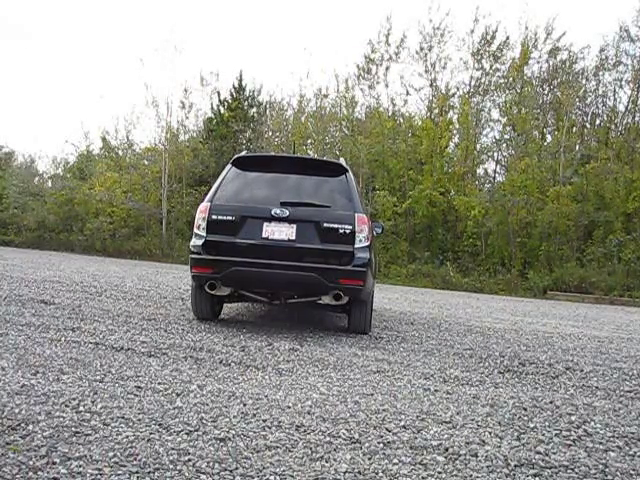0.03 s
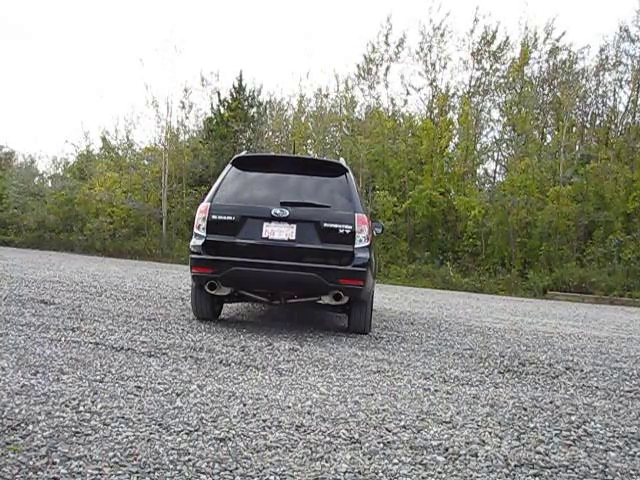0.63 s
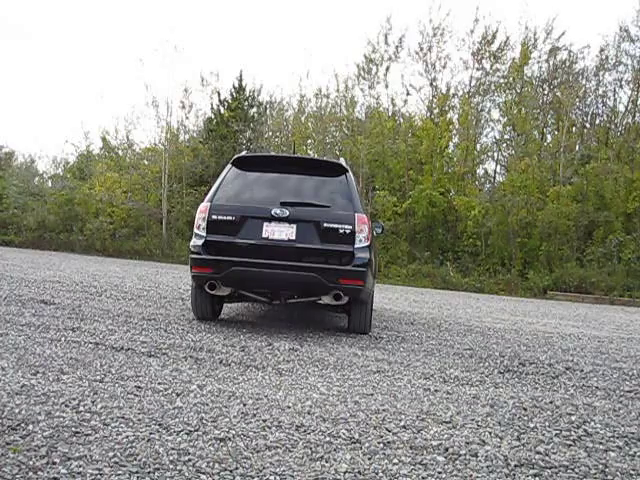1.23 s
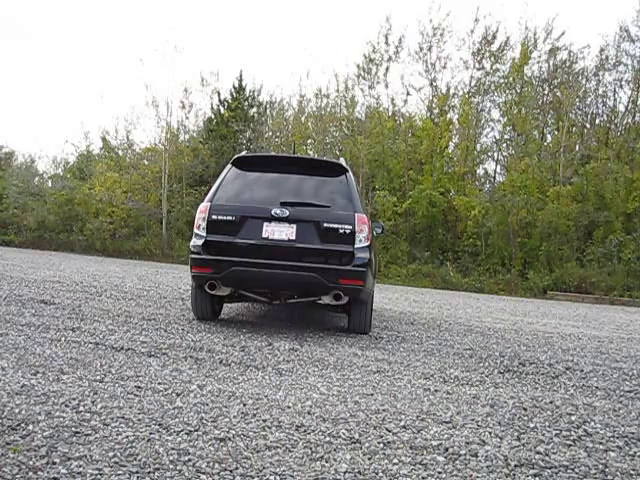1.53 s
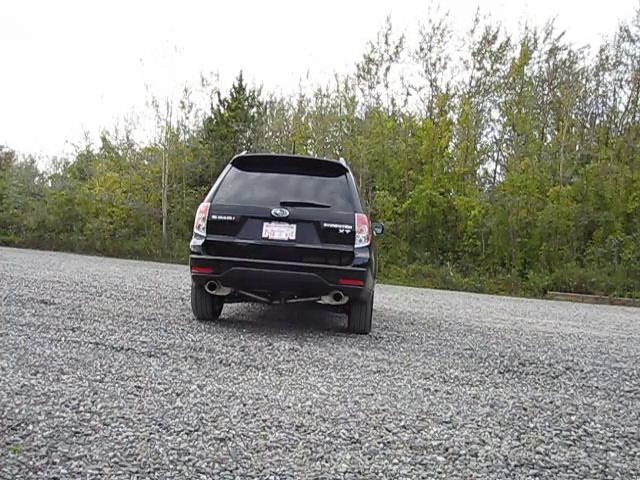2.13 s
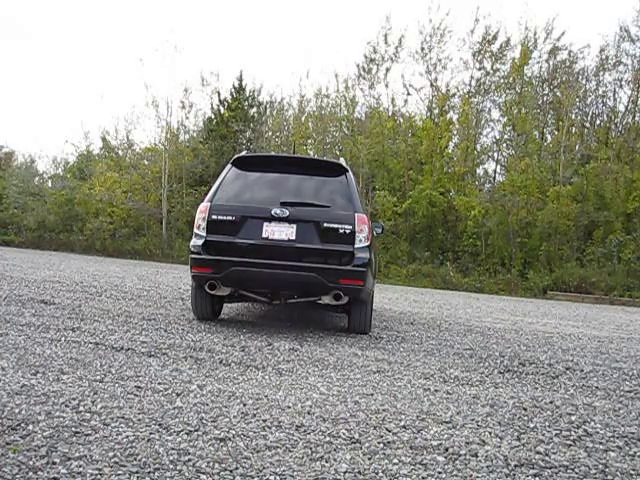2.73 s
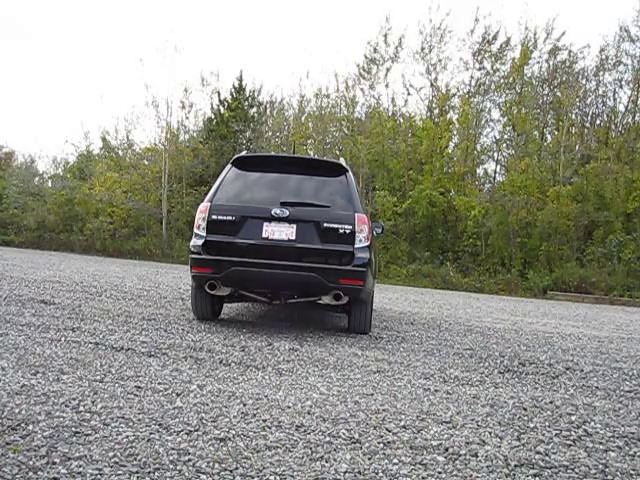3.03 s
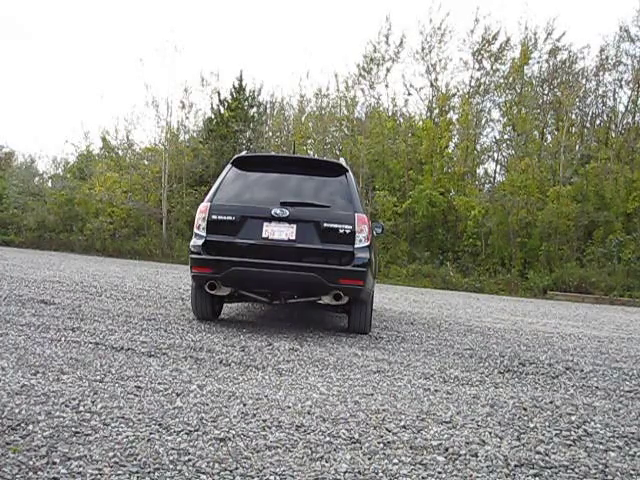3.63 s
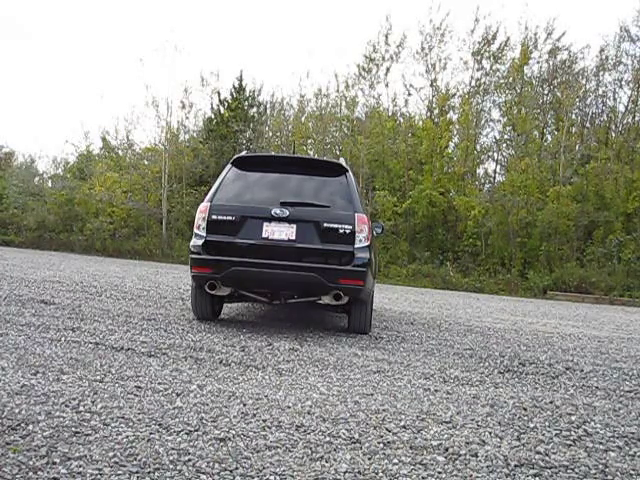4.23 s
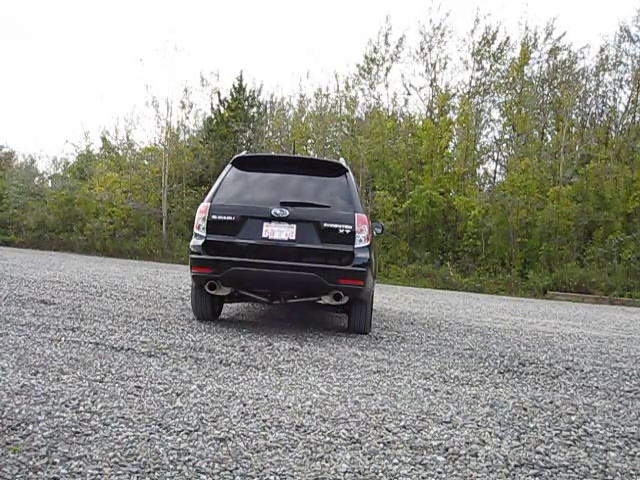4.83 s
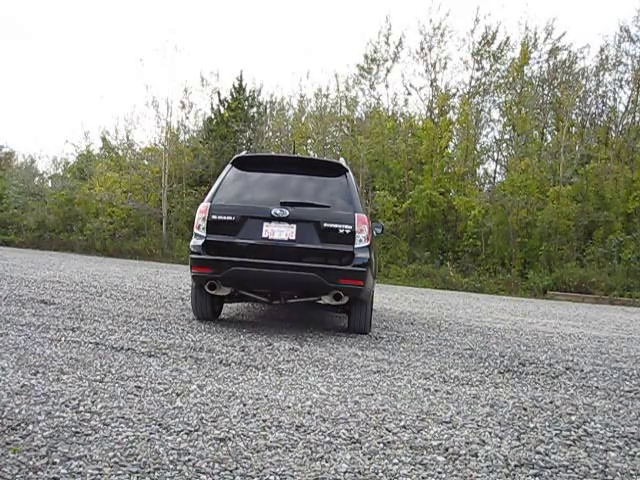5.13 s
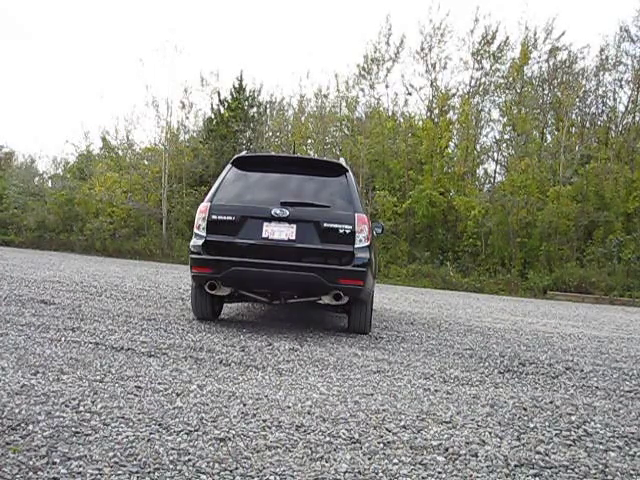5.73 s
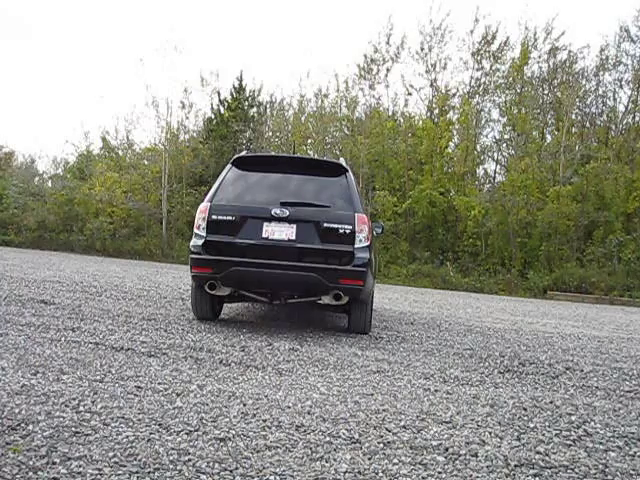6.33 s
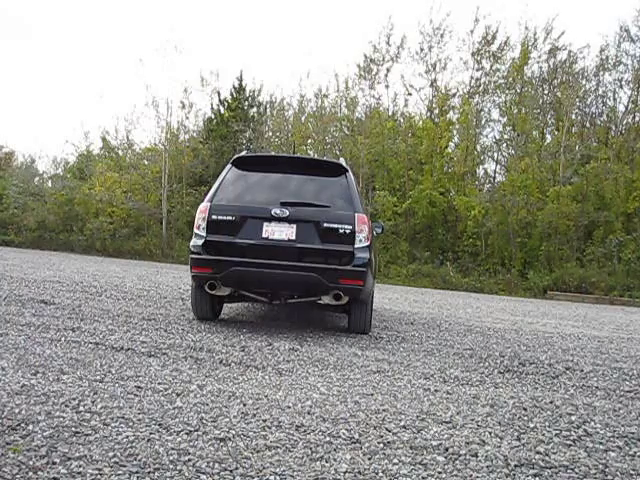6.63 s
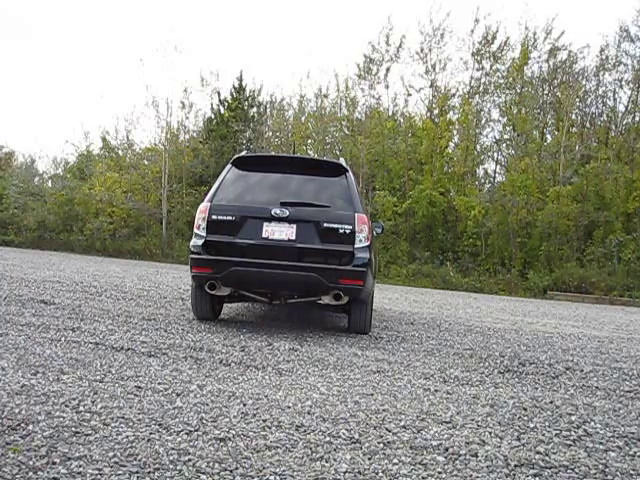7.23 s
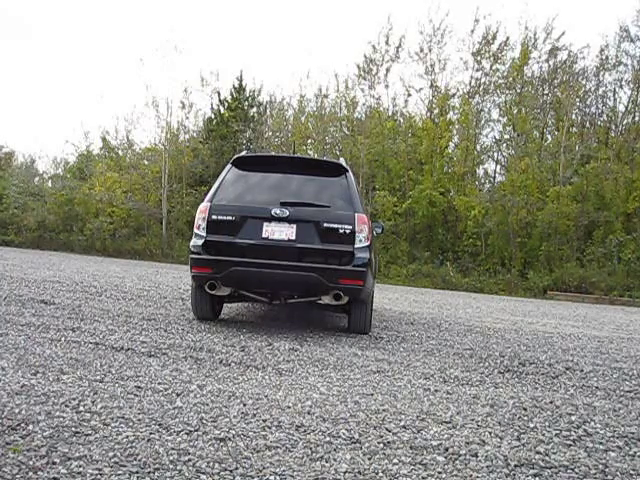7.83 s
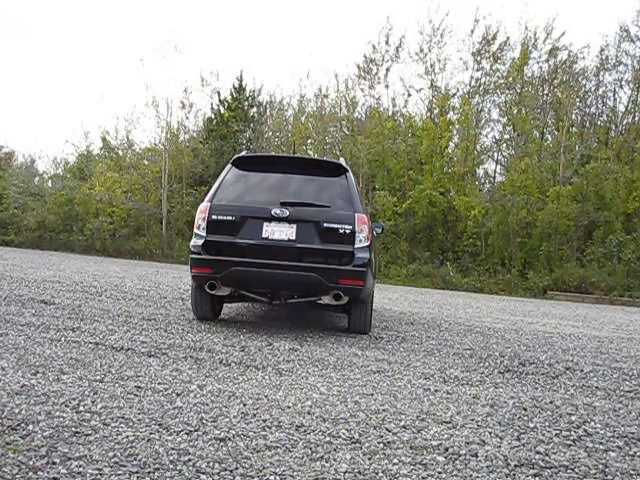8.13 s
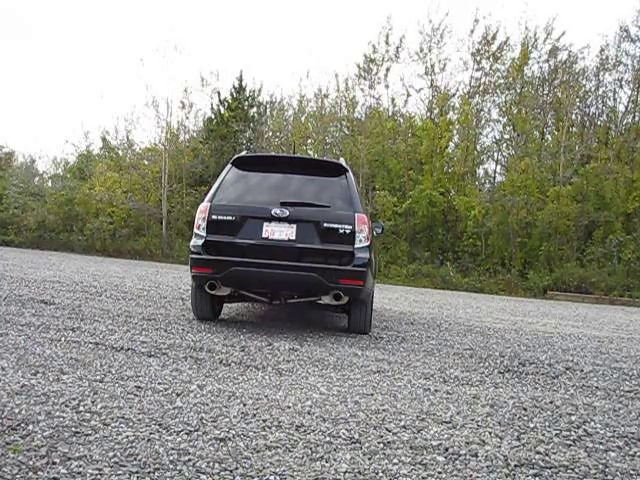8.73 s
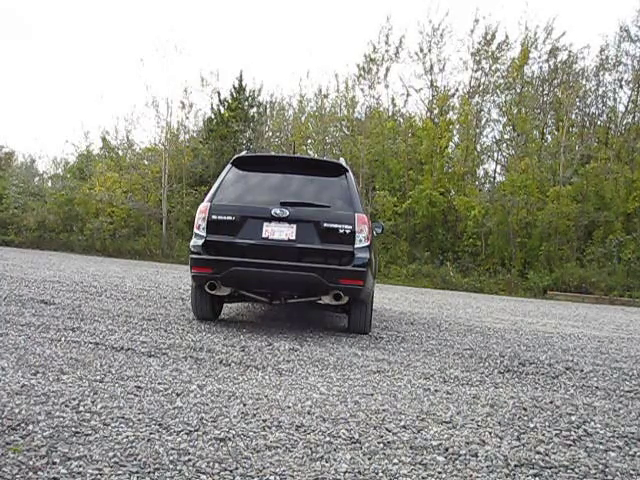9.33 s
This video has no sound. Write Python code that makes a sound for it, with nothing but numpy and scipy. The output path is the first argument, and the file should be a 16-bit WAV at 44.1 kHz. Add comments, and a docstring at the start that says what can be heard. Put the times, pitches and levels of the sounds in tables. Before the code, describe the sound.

Outdoors, close behind a stationary car, the exhaust burbles with an uneven, throaty beat. The engine is blipped lightly, revved once, pushed into a double rev with a sharp pop, then revved twice more, sinking slowly towards idle each time. The peaks rasp and whoosh, and the silencer thumps softly as the speed drops. Light wind rumbles behind it, and a distant bird gives a single faint chirp early on.

```python
"""A flat-four car revs again and again, parked on a gravel lot a few metres from the microphone.
The tailpipes face us: unequal headers make the firings lope, and they boom through pipe and silencer.
The gas rasps and hisses at the top of each rev, puffs when the throttle shuts and pops once.
Belts whine and valves tick under it. Further off are light wind and one bird's chirp in the trees."""
import sys
import numpy as np
from scipy import signal
from scipy.fft import rfft, irfft
from scipy.io import wavfile
from scipy.ndimage import uniform_filter1d

SR = 44100
rng = np.random.default_rng(int(sys.argv[2]) if len(sys.argv) > 2 else 0)


def to_wav(s):
    """Save 16-bit WAV."""
    ch = np.atleast_2d(s).T  # columns
    pcm = np.round(np.clip(ch, -1, 1) * 32767)  # PCM
    wavfile.write(sys.argv[1], SR, pcm.astype(np.int16))


N = 413658

# pedal blips, before the flywheel smooths them:
# (press [s], speed then [rpm], lift [s], speed then [rpm], idle returns unless pressed first [s])
BLIPS = [(-0.012, 1103.0, 0.309, 2038.0, 0.34), (0.924, 1335.0, 1.518, 3488.0, 2.11),
         (2.285, 2001.0, 2.907, 4242.0, 3.4), (3.325, 3360.0, 3.66, 4740.0, 4.9),
         (5.107, 1723.0, 6.014, 4501.0, 7.68), (7.76, 1704.0, 8.632, 4446.0, 9.65)]
# harmonics of the engine cycle, relative: (order, on throttle [dB], on overrun [dB], at idle [dB])
ENGINE_ORDERS = [(1, -28, -36, -31), (2, -28, -18.5, -36), (3, -41, -2.5, -2), (4, -3, 3, 0.5),
                 (5, -1.5, -2.5, -18), (6, -28, -18.5, -27), (7, -1, -.5, -18), (8, 1.5, -2.5, -13),
                 (9, 1.5, -4.5, -7), (10, -13.5, -16, -13), (11, 1.5, 0, -9.5), (12, 5, 0.5, -10.5),
                 (13, 1.5, -13, -5), (14, -18, -1.5, -19), (15, 2, 0, -16), (16, 9, 3, -8)]
# response of pipe and silencer: (frequency [Hz], gain [dB])
PIPE_RESPONSE = [(25, -26), (50, -11), (75, -9.5), (86, -1), (95, 2.5), (112, -1.04), (142, 3.5),
                 (175, 0.25), (208, -17), (245, -14.5), (305, -18), (380, -30.5), (520, -32), (900, -35.5)]
# gas flow, throttle open and shut: (speed [rpm], rasp [dB], rush [dB], hiss [dB])
FLOW_THROTTLE_OPEN = [(1390, -33.5, -44.5, -50), (2620, -30.5, -44, -50), (3340, -27.5, -42, -48),
                      (4490, -23, -38, -46)]
FLOW_THROTTLE_SHUT = [(1410, -39.5, -46.5, -52.5), (2010, -34.5, -44, -50.5), (3170, -28, -38.5, -45.5),
                      (4250, -27, -39, -47)]
# low, middle and high bands of the gas at the tailpipes: (frequency [Hz], relative level [dB])
RASP_SPECTRUM = [(150, -39.5), (260, -2), (400, -2), (470, -1), (535, 0), (570, -6), (630, -1), (705, 1.5),
                 (760, -5.5), (860, -4.5), (1050, -12.5), (1190, -7), (1380, -33), (2200, -50)]
RUSH_SPECTRUM = [(900, -4.5), (1400, 2), (1800, 4.5), (1980, 6), (2250, 2), (2650, 0.5), (2980, -2),
                 (3300, -4.5), (5000, -23)]
HISS_SPECTRUM = [(2400, -15.5), (3500, -2), (4100, 3.5), (4800, 0.5), (5800, 3.5), (7000, -1.5),
                 (8700, -4.5), (11000, -13.5), (14500, -22.5), (17000, -37)]
# whooshes of air around the top of the revs: (time [s], boost [dB], half-width [s])
WHOOSH_SWELLS = [(1.602, 3.5, 0.059), (2.976, 4.5, 0.085), (3.24, 4, 0.035), (3.698, 6.5, 0.055),
                 (5.9, 4, 0.026), (6.07, 6.5, 0.053), (8.56, 4, 0.038), (8.716, 6.5, 0.056)]
# puffs of late-burning gas: (time [s], level [dB], half-width [s])
PUFF_SWELLS = [(0.01, -16, 0.049), (0.694, -20.5, 0.013), (0.756, -38, 0.014), (3.024, -17, 0.012),
               (3.263, -20, 0.02), (3.307, -9, 0.01), (3.73, -18, 0.038), (3.78, -26, 0.014),
               (6.065, -18, 0.016), (6.183, -21, 0.016), (8.73, -21, .02), (8.869, -20, 0.017)]
# a puff in the silencer, the pop in the pipe: (frequency [Hz], relative level [dB])
PUFF_SPECTRUM = [(28, -18), (48, -1), (90, 6), (160, 6.5), (210, -3.5), (310, -22), (600, -41)]
POP_SPECTRUM = [(60, -11), (150, 5), (250, 3), (420, -5), (700, -24)]
# engine bay at low speed, ring of the valve gear: (frequency [Hz], relative level [dB])
BAY_SPECTRUM = [(230, -4), (310, 0.5), (370, -9), (460, -8), (520, -4.5), (565, -13.5), (640, 2), (700, 1),
                (750, -8.5), (815, 2), (880, -6.5), (1150, -9), (1400, -19.5)]
VALVE_SPECTRUM = [(2200, -24.5), (2750, -13), (2900, 5), (3030, 1), (3200, -17), (4000, -27.5)]
# tones of the belt-driven parts: (order, relative level [dB])
BELT_ORDERS = [(40, -15), (48, -14), (68, -21)]
# the bird's two voices: (time [s], upper pitch [Hz], level [dB], lower pitch [Hz], level [dB])
BIRD_VOICES = [(2.23, 8890, -73, 7900, -68), (2.255, 8400, -53, 7680, -63), (2.28, 8330, -51, 7480, -64),
               (2.31, 8480, -50, 7620, -49), (2.335, 8620, -50, 7820, -55), (2.352, 8950, -55, 8100, -53),
               (2.368, 9400, -72, 8300, -75)]
# light wind over the lot: (frequency [Hz], relative level [dB])
WIND_SPECTRUM = [(24, -24), (40, 0.5), (60, 7), (120, 12), (300, 3), (600, -21.5), (2000, -32.5)]


def exhaust(turns, rpm, throttle, overrun, idle, boom_db=-12.5, lope_rpm=3105, sag_rpm=2650):
    """The firings boom through pipe and silencer, straight towards the microphone."""
    pulses, octaves = np.zeros(N), np.log2(rpm / lope_rpm)
    for order, on_db, off_db, idle_db in ENGINE_ORDERS:
        db = throttle * on_db + overrun * off_db + idle * idle_db
        db += 14 * octaves * (order != 4)  # with speed the lope gains on the firing order
        db += 18 * octaves * overrun * (order > 9)  # the pulses lose their edge as the engine slows
        db += (.5 + .19 * order) * drift(6.2)
        # on the overrun the late pair dominates, and the pattern comes one firing later
        on_phase = firing_phase(order, late_gain=1)
        off_phase = firing_phase(order, late_gain=1.79) - np.pi / 2 * order
        phase = off_phase + throttle * np.angle(np.exp(1j * (on_phase - off_phase)))
        pulses += from_db(db) * np.cos(2 * np.pi * order * turns + phase)
    sag_db = 8 * overrun * np.minimum(np.log2(rpm / sag_rpm), 0)
    dip_db = 1.2 * np.sin(np.pi * throttle)  # deepest at half throttle
    level_db = boom_db + sag_db - 11.5 * idle - dip_db
    return from_db(level_db) * evened(colour(pulses, PIPE_RESPONSE))


def firing_phase(order, late_gain, header_lag_cycles=.0359):
    """Phase of one order: of four firings a cycle, one pair arrives late through its longer header."""
    late = np.array([0, 0, 1, 1])
    arrivals = np.arange(4) / 4 + header_lag_cycles * late
    return np.angle(np.sum(late_gain ** late * np.exp(-2j * np.pi * order * arrivals)) + 1e-6)


def engine_speed(flywheel_s=.14, coast_rpm_per_s=1726, bow=.6656):
    """The rpm climbs with the pedal down and falls after; the flywheel rounds the corners."""
    corners = [corner for press, low, lift, high, _ in BLIPS for corner in ((press, low), (lift, high))]
    last_lift, last_rpm = corners[-1]
    corners.append((N / SR, last_rpm - coast_rpm_per_s * (N / SR - last_lift)))
    # each climb and fall is bowed, steepest at high speed
    rpm = in_time([(s, speed ** bow) for s, speed in corners])[0] ** (1 / bow)
    for _ in range(3):
        rpm = uniform_filter1d(rpm, int(flywheel_s * SR), mode="nearest")
    return rpm


def engine_load(open_s=.091, shut_s=.041, settle_s=.053, open_lag_s=.0077, shut_lag_s=.02):
    """Shares of throttle, overrun and idle, adding up to 1; they trail the pedal by a moment."""
    throttle = sum(step(press + open_lag_s, open_s) * (1 - step(lift + shut_lag_s, shut_s))
                   for press, _, lift, _, _ in BLIPS)
    next_presses = [blip[0] for blip in BLIPS[1:]] + [np.inf]
    settled = sum(step(blip[-1], settle_s) * (1 - step(press + open_lag_s, open_s))
                  for blip, press in zip(BLIPS, next_presses))
    idle = settled * (1 - throttle)
    return throttle, 1 - throttle - idle, idle


def gas(turns, rpm, throttle, low_cut_hz=380, bay_db=4, bay_below_rpm=2900):
    """Gas surges once a cycle and on each firing; at low speed the engine bay beyond shows through."""
    rasp_db, rush_db, hiss_db = flow_levels(rpm, throttle)
    angle = 2 * np.pi * (turns - .042)
    surge_db = 1.5 * np.cos(angle) + np.cos(4 * angle) + 2.2 * drift(76)
    low_cut = signal.butter(3, low_cut_hz, "high", fs=SR, output="sos")
    turbulence = signal.sosfilt(low_cut, noise(RASP_SPECTRUM, from_db(surge_db)))
    # the pipes bark in step with the surges, more raggedly with the throttle open
    bark = rms_one(tailpipe_blare(turns) * from_db(.7 * surge_db))
    ragged = .22 + .28 * throttle
    pipes = np.sqrt(ragged) * turbulence + np.sqrt(1 - ragged) * bark
    bay_share = np.clip((bay_below_rpm - rpm) / 1040, 0, .9) * (1 - .61 * throttle)
    bay = from_db(bay_db) * noise(BAY_SPECTRUM)
    rasp = np.sqrt(1 - bay_share) * pipes + np.sqrt(bay_share) * bay + belt_whine(turns)
    rush = noise(RUSH_SPECTRUM, from_db(.44 * surge_db))
    hiss = noise(HISS_SPECTRUM, from_db(.43 * surge_db))
    return from_db(rasp_db) * rasp + from_db(rush_db) * rush + from_db(hiss_db) * hiss


def flow_levels(rpm, throttle, hiss_growth_db_per_s=.25):
    """Rasp, rush and hiss in dB: they follow speed and throttle, and swell with each whoosh."""
    t = np.arange(N) / SR
    open_db, shut_db = look_up(FLOW_THROTTLE_OPEN, rpm), look_up(FLOW_THROTTLE_SHUT, rpm)
    rasp_db, rush_db, hiss_db = throttle * open_db + (1 - throttle) * shut_db
    whoosh_db = sum(db * np.exp(-((t - s) / width) ** 2) for s, db, width in WHOOSH_SWELLS)
    growth_db = hiss_growth_db_per_s * (t - t.mean())
    return rasp_db + whoosh_db, rush_db + whoosh_db, hiss_db + .91 * whoosh_db + growth_db


def tailpipe_blare(turns, top_order=45, waver_db=4):
    """The sharp edges of the firings ring the tailpipes in a dense comb of wavering orders."""
    edges = np.zeros(N)
    for order in range(len(ENGINE_ORDERS) + 1, top_order + 1):
        db = waver_db * drift(3.4) - 4 * (order % 4 == 2)  # weaker midway between firing harmonics
        # reflections along the pipes scatter the orders in time
        edges += from_db(db) * np.cos(2 * np.pi * (order * turns + rng.random()))
    return rms_one(colour(edges, RASP_SPECTRUM))


def puffs():
    """Late-burning gas thumps dully in the silencer."""
    t = np.arange(N) / SR
    swell = sum(from_db(db) * np.exp(-((t - s) / width) ** 2) for s, db, width in PUFF_SWELLS)
    return swell * noise(PUFF_SPECTRUM)


def pop(at_s=3.3, level_db=-10.5, rise_s=.0017, decay_s=.01):
    """One sharp bang in the pipe as the throttle snaps open again."""
    age = np.maximum(np.arange(N) / SR - at_s, 0)
    return from_db(level_db) * step(at_s, rise_s) * np.exp(-age / decay_s) * noise(POP_SPECTRUM)


def belt_whine(turns, gain_db=3.5, muffle_hz=1040):
    """Belt-driven parts sing; the bodywork keeps their highest notes from the microphone."""
    tones = sum(from_db(db + gain_db + 2 * drift(5.7)) * np.sin(2 * np.pi * order * turns)
                for order, db in BELT_ORDERS)
    return signal.sosfilt(signal.butter(4, muffle_hz, fs=SR, output="sos"), tones)


def valves(turns, level_db=-54.5, depth_db=6):
    """The valve gear ticks thinly, once for each turn of the crank."""
    ticks = from_db(depth_db * np.sin(2 * np.pi * 2 * turns))
    return from_db(level_db) * noise(VALVE_SPECTRUM, ticks)


def bird(quaver_db=1):
    """Off in the trees, both sides of a small bird's syrinx whistle one thin scooped note."""
    upper_hz, upper_db, lower_hz, lower_db = in_time(BIRD_VOICES)
    t = np.arange(N) / SR
    voices = sum(from_db(db + quaver_db * drift(89)) * np.sin(2 * np.pi * np.cumsum(hz) / SR)
                 for hz, db in [(upper_hz, upper_db), (lower_hz, lower_db)])
    return voices * (t > BIRD_VOICES[0][0]) * (t < BIRD_VOICES[-1][0])


def open_air(wind_db=-35, hiss_db=-58.5):
    """Light wind rumbles over the lot, with a faint steady hiss behind everything."""
    return from_db(wind_db) * noise(WIND_SPECTRUM) + from_db(hiss_db) * rng.standard_normal(N)


def from_db(db):
    """Decibels as amplitude."""
    return 10 ** (db / 20)


def rms_one(x):
    """The sound scaled to an overall rms of 1."""
    return x / np.sqrt(np.mean(x ** 2) + 1e-20)


def evened(x, window_s=.08):
    """The sound held at a running rms of 1."""
    size = int(window_s * SR)
    return x / np.sqrt(uniform_filter1d(uniform_filter1d(x * x, size), size) + 1e-12)


def look_up(rows, at):
    """A table's later columns, interpolated along its first."""
    knots, *columns = np.transpose(rows)
    return np.array([np.interp(at, knots, column) for column in columns])


def in_time(rows):
    """The columns of a timed table, one value a sample."""
    return look_up(rows, np.arange(N) / SR)


def step(at_s, rise_s):
    """A smooth rise from 0 to 1 around a moment."""
    return .5 + .5 * np.tanh((np.arange(N) / SR - at_s) / rise_s)


def drift(rate_hz, hop=40):
    """A slow random wander of rms about 1."""
    pole = np.exp(-2 * np.pi * hop * rate_hz / SR)
    white = rng.standard_normal(N // hop + 2002)
    slow = signal.lfilter([1], [1, -2 * pole, pole * pole], white)[2000:]  # once the filter has settled
    return np.interp(np.arange(N) / hop, np.arange(len(slow)), rms_one(slow))


def colour(x, spectrum, size=16384):
    """A minimum-phase filter with the given spectrum: it rings after each pulse, never before."""
    hz, db = np.transpose(spectrum)
    grid = np.maximum(np.arange(size // 2 + 1) * SR / size, 1)
    gain = from_db(np.interp(np.log(grid), np.log(hz), db))
    roll_off = np.minimum(grid / hz[0], 1) * np.minimum(hz[-1] / grid, 1) ** 2
    cepstrum = irfft(np.log(gain * roll_off))
    cepstrum[1:size // 2] *= 2
    cepstrum[size // 2 + 1:] = 0
    return signal.fftconvolve(x, irfft(np.exp(rfft(cepstrum))))[:N]


def noise(spectrum, gate=1):
    """Gated noise in a resonant colour, at rms 1."""
    return rms_one(colour(rng.standard_normal(N) * gate, spectrum))


def scene():
    """One microphone behind the car: the engine close, the wind and the bird beyond."""
    rpm = engine_speed()
    throttle, overrun, idle = engine_load()
    # turns of the engine cycle (two of the crank each), slightly unsteady
    turns = .615 + np.cumsum(rpm / 120) / SR + .001 * drift(15)
    car = exhaust(turns, rpm, throttle, overrun, idle) + gas(turns, rpm, throttle)
    car = car + puffs() + pop() + valves(turns)
    return (car + open_air() + bird())[None]


def record(dry, cutoff_hz=17100):
    """A steep low-pass cuts the very top of what reaches the microphone."""
    return signal.sosfilt(signal.ellip(10, .1, 80, cutoff_hz, fs=SR, output="sos"), dry)


dry = scene()
out = record(dry)
to_wav(out)
```